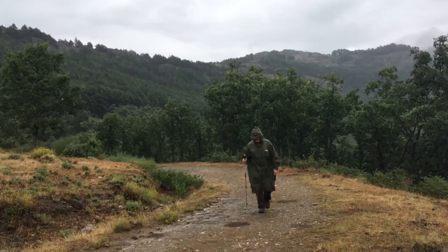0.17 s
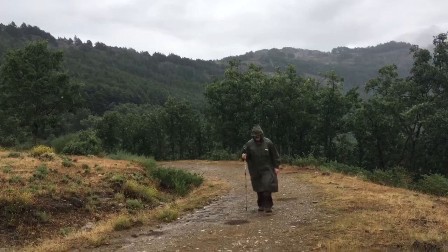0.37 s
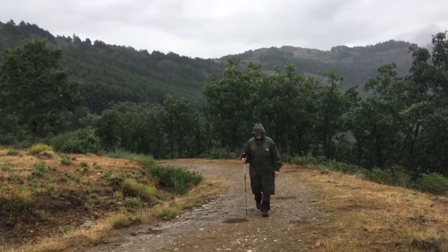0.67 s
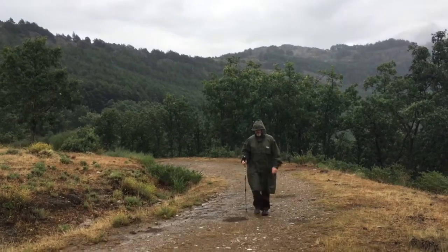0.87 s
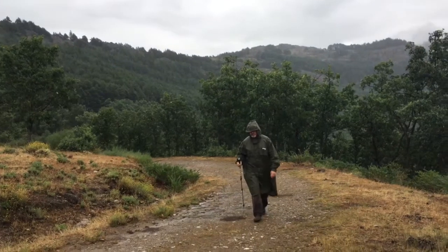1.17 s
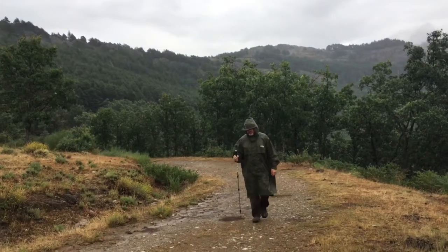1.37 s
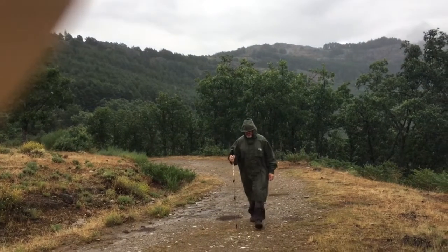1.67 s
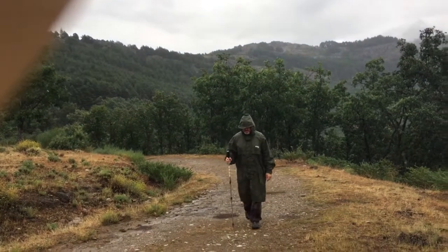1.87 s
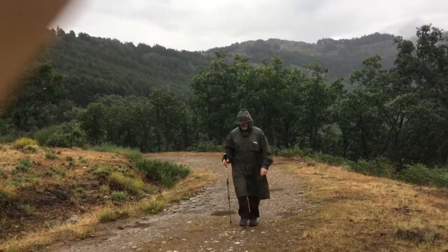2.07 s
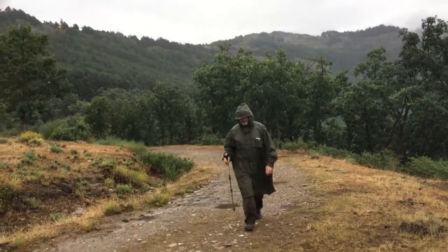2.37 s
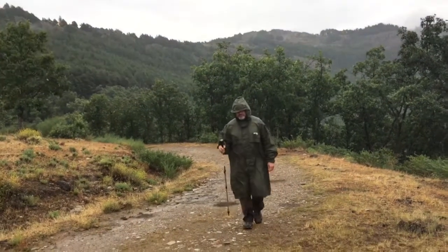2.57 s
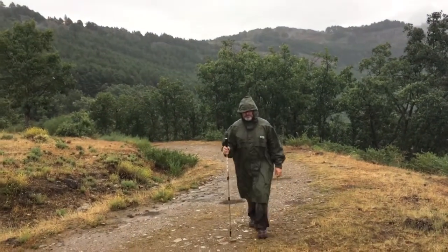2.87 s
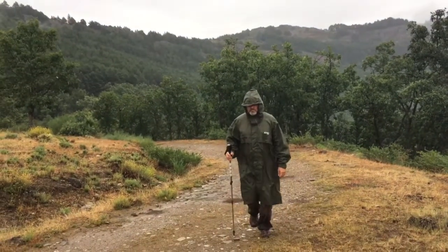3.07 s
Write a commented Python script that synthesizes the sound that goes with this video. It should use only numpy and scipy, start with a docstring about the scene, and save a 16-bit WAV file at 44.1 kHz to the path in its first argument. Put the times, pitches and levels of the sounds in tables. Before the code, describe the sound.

Raindrops tapping sharply and irregularly on taut umbrella cloth, over a soft, steady rain hiss outdoors

```python
"""Steady rain on a gravel track in wooded hills, heard from under an umbrella.
Far rain is filtered noise; small drops are pitched grains; big drops ring the taut cloth with noise bursts.
Wind is low, lumpy noise whose gusts reach higher on the microphone.
A walker's boots crunch wet gravel as dense clicks and squeeze out water as chirps;
a metal pole tip rings on the stones as damped modes."""
import sys
import numpy as np
from scipy import signal
from scipy.fft import rfft, irfft
from scipy.io import wavfile
from scipy.ndimage import uniform_filter1d

SR = 44100
rng = np.random.default_rng(int(sys.argv[2]) if len(sys.argv) > 2 else 0)


def materialize(psi):
    """Save the field psi as 16-bit PCM at rate SR to the path in sys.argv[1].

    A 1-D psi becomes a single channel; in a 2-D psi each row is a channel.
    """
    bounded = np.clip(np.atleast_2d(psi).T, -1, 1)
    quanta = np.round(bounded * 32767).astype(np.int16)
    wavfile.write(sys.argv[1], SR, quanta)


N = 142443
GRAIN_SAMPLES = 4096  # buffer of one ring or burst
DROP_LAG_S, PANEL_RISE_S = .0009, .0007


def gain_of(db):
    """Decibels to amplitude."""
    return 10 ** (np.asarray(db) / 20)


def evened(x):
    """Scales to unit RMS."""
    return x / np.sqrt(np.mean(x ** 2) + 1e-20)


def read(points, hz):
    """Interpolates a spectrum table over log frequency."""
    f, value = np.transpose(points)
    return np.interp(np.log(hz + 1), np.log(f + 1), value)


def over_time(points):
    """Interpolates a level table at every sample."""
    s, value = np.transpose(points)
    return np.interp(np.arange(N) / SR, s, value)


def add(mix, s, sound):
    """Adds a sound at its start time, cut at the end of the mix."""
    part = mix[round(s * SR):][:len(sound)]
    part += sound[:len(part)]


def coloured(x, spectrum, tilt_db_per_octave=0):
    """Filters by a dB spectrum, tilted around about 3 kHz."""
    hz = np.fft.rfftfreq(len(x), 1 / SR)
    gain_db = read(spectrum, hz) + tilt_db_per_octave * np.log2((hz + 300) / 3000)
    return irfft(rfft(x) * gain_of(gain_db), len(x))


def dying(t60_s, rise_s=0.00013):
    """Quick rise, then an exponential fall."""
    t = np.arange(GRAIN_SAMPLES) / SR
    return (1 - np.exp(-t / rise_s)) * gain_of(-60 * t / t60_s)


def ring(hz, t60_s, rise_s=0.00034):
    """One damped mode."""
    t = np.arange(GRAIN_SAMPLES) / SR
    return dying(t60_s, rise_s) * np.sin(2 * np.pi * hz * t)


def burst(lo_hz, hi_hz, t60_s):
    """A click and a dying puff of noise in one band."""
    band = signal.butter(2, [lo_hz, hi_hz], "band", fs=SR, output="sos")
    noise = rng.standard_normal(GRAIN_SAMPLES)
    # 2.2: height of the click over the noise; narrower bands get a taller click
    click = 2.2 * np.sqrt(SR / (hi_hz - lo_hz)) * (np.arange(GRAIN_SAMPLES) == 8)
    return dying(t60_s) * evened(signal.sosfilt(band, noise + click))


# Rain spectrum: (frequency [Hz], relative density [dB per Hz])
RAIN_SPECTRUM = [(88, -41), (150, -6), (179, -20.5), (235, 0.5), (454, -6.5), (969, -1.5), (1150, -2.5),
                 (1350, -0.5), (2190, 0.5), (4240, -4), (4860, -7.5), (6020, -4), (7750, -10.5),
                 (8880, -6.5), (10400, -10), (13400, -6.5), (15600, -9.5)]
# Far rain: (time [s], level [dB])
WASH_LEVEL_DB = [(0.3, -56), (2.33, -54), (2.52, -54.5), (3.23, -53.5)]


def wash():
    """Far rain: noise with patches drifting over time and pitch, and a faint shared flicker."""
    frames = N // 128 + 5
    real, imag, patches = rng.standard_normal((frames, 257, 3)).T
    patches = uniform_filter1d(patches, size=8, axis=0)  # over frequency
    patches = evened(uniform_filter1d(patches, size=16, axis=1))  # over time
    flicker = evened(uniform_filter1d(rng.standard_normal(frames), size=5))
    flicker_db = 1.0 * patches + 1.5 * flicker
    bins = (real + 1j * imag) * gain_of(flicker_db)
    noise = signal.istft(bins, nperseg=512, noverlap=384)[1][:N]
    rain = evened(coloured(noise, [(40, -60), *RAIN_SPECTRUM]))
    return gain_of(over_time(WASH_LEVEL_DB)) * rain


PATTER_DB, PATTER_PER_S, PATTER_SPREAD_DB = -65.5, 1500, 5


def patter():
    """Small drops on cloth, grass and stones: short damped grains at 24 pitches."""
    spread_db = PATTER_SPREAD_DB * np.minimum(rng.exponential(1, N), 3)
    hits = gain_of(spread_db) * (rng.random(N) < PATTER_PER_S / SR)
    kind = rng.integers(0, 24, N)
    out = np.zeros(N)
    for k, hz in enumerate(np.geomspace(600, 14000, num=24)):
        grain = evened(ring(hz, 7 / hz + 0.00036)[:1024])
        grain *= gain_of(read(RAIN_SPECTRUM, hz) + 2.4 * np.log2(hz / 2000))
        out += signal.oaconvolve(hits * (kind == k), grain)[:N]
    return gain_of(PATTER_DB) * evened(out)


# Wind spectrum: (frequency [Hz], relative density [dB per Hz])
WIND_SPECTRUM = [(15, -46), (25, -20), (38, 3), (58, 7), (85, 0.5), (120, -5), (160, -12), (230, -23.5),
                 (400, -48)]
# Upper edge of strong gusts: (frequency [Hz], relative density [dB per Hz])
FLAP_SPECTRUM = [(60, -33), (110, 1), (170, 5.5), (230, -7.5), (300, -13), (500, -52)]
# Wind before flutter: (time [s], level [dB])
GUST_LEVEL_DB = [(0.12, -60), (0.14, -56), (0.21, -64), (0.33, -54), (0.35, -65), (0.4, -64), (0.47, -64),
                 (0.6, -56), (0.64, -63.5), (0.86, -46.5), (0.88, -52), (1.01, -51.5), (1.04, -62.5),
                 (1.14, -51), (1.18, -59), (1.21, -53.5), (1.24, -57.5), (1.35, -49), (1.39, -62.5),
                 (1.5, -51.5), (1.6, -57), (1.63, -58), (1.69, -45.5), (1.72, -64), (1.76, -43.5),
                 (1.83, -56.5), (1.91, -51.5), (1.94, -66.5), (2.14, -60), (2.34, -70.5), (2.46, -50),
                 (2.58, -71), (2.64, -59), (2.67, -86), (2.75, -63), (2.86, -70), (2.96, -47.5), (3.0, -36),
                 (3.14, -66.5), (3.23, -69)]
FLUTTER_DB = 1  # RMS
FLAP_DB, FLAP_AT_GUST_DB, FLAP_DB_PER_GUST_DB = -62.5, -46.5, 2.03


def wind():
    """Lumpy low pressure on the microphone; strong gusts reach higher."""
    rumble = evened(coloured(rng.standard_normal(N), WIND_SPECTRUM))
    rumble /= 0.9 + np.sqrt(uniform_filter1d(rumble ** 2, size=2000))  # tames its own swells
    puffs = uniform_filter1d(rng.standard_normal(N), size=900)
    puffs = evened(uniform_filter1d(puffs, size=900))
    gust_db = over_time(GUST_LEVEL_DB) + FLUTTER_DB * puffs
    flap_db = FLAP_DB + FLAP_DB_PER_GUST_DB * (gust_db - FLAP_AT_GUST_DB)
    flap = evened(coloured(rng.standard_normal(N), FLAP_SPECTRUM)) * gain_of(flap_db)
    return gain_of(gust_db) * evened(rumble) + flap


# Fine drops, treble only: (time [s], level [dB])
FINE_DROPS = [(0.1256, -51), (0.1354, -55), (0.2593, -46), (0.3471, -55), (0.3684, -54), (0.5167, -59),
              (0.6274, -51), (1.6474, -50), (1.732, -46), (1.7489, -55), (1.7908, -44), (2.6314, -49),
              (3.1208, -39)]


def tick(s, db):
    """A fine drop bursting: a dying puff of treble noise."""
    return s + DROP_LAG_S, gain_of(db) * burst(10000, 15800, t60_s=.006)


# Big drops on the cloth: (time [s], level [dB], panel mode [Hz], ring T60 [s],
# thud [dB re level], snap [dB re level], spray [dB re level])
CLOTH_DROPS = [(0.315, -49.5, 2300, 0.0066, -1.5, -15, -21), (0.39, -39.5, 1850, 0.0083, -14.5, -11, -15),
               (0.825, -31, 2110, 0.0075, -13.5, -10, -15), (0.847, -49, 3160, 0.011, -28, -9, -15),
               (0.942, -48, 1220, 0.0065, -5.5, -20, -19), (1.363, -33.5, 1935, 0.015, -7.5, -13.5, -29),
               (1.454, -34, 970, 0.003, -8.5, -7.5, -15), (1.545, -29, 1270, 0.0051, -18.5, -13.5, -12),
               (1.556, -32.5, 1900, 0.008, -12.5, -10, -18), (1.587, -31.5, 1830, 0.01, -13, -6, -15),
               (1.638, -22, 1910, 0.003, -19.5, -23.5, -19), (1.665, -17, 1750, 0.0041, -8, -6, -17),
               (1.784, -64.5, 2600, 0.0076, 8, -9, -17), (1.825, -43, 2050, 0.009, -30, -0.5, -12),
               (1.835, -39.5, 2150, 0.0072, -20, -6, -9), (1.848, -47, 2120, 0.0075, -27, -9, -15),
               (1.863, -29, 1830, 0.0035, -49, -11, -11), (2.031, -46, 3670, 0.007, -17, -5, -3),
               (2.092, -26, 2240, 0.007, -14.5, -7.5, -20), (2.133, -48, 2150, 0.011, -10, 0, -7),
               (2.143, -28, 2100, 0.0064, -20.5, -13, -16), (2.168, -38.5, 2310, 0.016, -11.5, -10, -13),
               (2.198, -45.5, 3600, 0.009, -16, -13, -20), (2.311, -36, 2000, 0.0045, -15, -14, -14),
               (2.324, -37.5, 2010, 0.0076, -16, -19, -15), (2.375, -29, 2900, 0.0066, -20, -26, -12),
               (2.384, -35, 3570, 0.0095, -16.5, -0.5, -13), (2.611, -42.5, 2150, 0.015, -12, -9, -13),
               (2.616, -34.5, 2350, 0.012, -12, -13, -4), (2.624, -32.5, 1630, 0.0095, -8.5, -8.5, -19),
               (2.709, -21.5, 1610, 0.003, -17.5, -10, -16.5), (2.727, -45, 1830, 0.0045, -20, -11, -3),
               (2.74, -36.5, 1720, 0.006, -12.5, -15, -17), (2.782, -28.5, 1730, 0.0058, -18.5, -8, -12),
               (2.83, -34.5, 945, 0.003, -8.5, -16, -16), (2.896, -44, 1830, 0.009, -9, -12, -15),
               (3.019, -44.5, 1090, 0.011, -12, -20, -22), (3.142, -28.5, 2120, 0.0083, -20, -15.5, -22),
               (3.188, -33.5, 2160, 0.003, -17.5, -16, -19.5)]
MODE_RATIO, RATTLE_DB = 1.35, -13


def tap(s, db, hz, t60_s, thud_db, snap_db, spray_db):
    """A big drop: the cloth panel rings in three modes, with a thud, a rattle, a snap and spray."""
    panel = 2.14 * ring(hz, t60_s, PANEL_RISE_S)
    panel -= 0.42 * ring(hz * MODE_RATIO, 0.69 * t60_s)
    panel += 0.13 * ring(hz / MODE_RATIO, 0.5 * t60_s)
    noise = gain_of(thud_db) * burst(280, 1400, t60_s=.018)
    noise += gain_of(snap_db) * burst(3000, 7500, t60_s=.011)
    noise += gain_of(spray_db) * burst(7500, 15500, t60_s=.011)
    noise += gain_of(RATTLE_DB) * burst(900, 3000, t60_s=.02)
    return s + DROP_LAG_S, gain_of(db) * (panel + noise)


# Pole tip on stone: (time [s], knock [Hz], knock level [dB], clack level [dB], ping level [dB])
POLE_STRIKES = [(.6143, 2070, -26, -32, -42), (2.9738, 2120, -29, -34, -50)]
KNOCK_T60_S, PING_T60_S, PING_LAG_S = .018, .095, .002
PING_HZ, PING_BEAT_HZ = 9830, 47


def pole(s, hz, knock_db, clack_db, ping_db):
    """The tip knocks and clacks; then the tube pings with a beating pair of modes."""
    ping = ring(PING_HZ, PING_T60_S) + 0.7 * ring(PING_HZ + PING_BEAT_HZ, PING_T60_S)
    ping = np.roll(ping, round(PING_LAG_S * SR))
    knock = gain_of(knock_db) * ring(hz, KNOCK_T60_S, PANEL_RISE_S)
    clack = gain_of(clack_db) * burst(700, 15000, t60_s=.018)
    return s, knock + clack + gain_of(ping_db) * ping


# Boots on wet gravel: (time [s], length [s], level [dB], brightness [dB per octave])
BOOT_STEPS = [(.625, 0.072, -51.5, 3), (1.2, 0.12, -56.5, 1.5), (1.3, 0.096, -57.5, 8.5),
              (1.53, 0.1, -53.5, 0.5), (1.78, 0.095, -51.5, 4), (2.18, 0.026, -55, 3.5),
              (2.368, 0.044, -45, 2.5), (2.39, 0.12, -53.5, 1), (2.6, 0.045, -67, 13),
              (2.655, 0.022, -53, 0), (2.72, 0.086, -53, 0), (2.928, 0.063, -54, 3.5),
              (2.947, 0.028, -43, 4.5), (2.975, 0.013, -42.5, 0), (3.12, .08, -79, 0)]
# Gravel spectrum: (frequency [Hz], relative density [dB per Hz])
GRIT_SPECTRUM = [(150, 23), (500, -24.5), (1200, 0), (2300, 3), (4500, -4), (8000, -10.5), (11000, -11.5),
                 (16000, -22.5)]
GRIT_PER_S, GRIT_SPREAD_DB = 7000, 3.0


def step(s, length_s, db, tilt_db_per_octave):
    """Gravel grinds: dense uneven clicks, each a short crumble, under a quick load and slow release."""
    n = 6000
    t = np.arange(n) / SR
    spread_db = GRIT_SPREAD_DB * np.minimum(rng.exponential(1, n), 3)
    clicks = rng.standard_normal(n) * gain_of(spread_db) * (rng.random(n) < GRIT_PER_S / SR)
    crumble = burst(200, 18000, t60_s=.004)[:400]
    spectrum = rfft(signal.oaconvolve(clicks, crumble)[:n])
    flat = irfft(spectrum / uniform_filter1d(abs(spectrum), size=120), n)
    grit = evened(coloured(flat, GRIT_SPECTRUM, tilt_db_per_octave))
    load = np.sin(np.pi * np.clip(t / length_s, 0, 1) ** 0.45)
    return s, gain_of(db) * grit * load


# Water squeezed from under a boot: (time [s], start [Hz], end [Hz], length [s], level [dB])
SQUEEZED_WATER = [(2.9435, 7000, 5750, .0065, -35), (2.9475, 9200, 8300, .004, -36),
                  (2.950, 8200, 7000, .004, -36), (2.9525, 6500, 5600, .003, -37),
                  (2.953, 4600, 3900, .0035, -34), (2.957, 3600, 1800, .009, -40)]


def squelch(s, from_hz, to_hz, length_s, db):
    """A short falling chirp with a ragged envelope."""
    u = np.arange(0, 1, 1 / (length_s * SR))
    hz = to_hz + (from_hz - to_hz) * (1 - u) ** 2
    ragged = 1 + 0.3 * evened(uniform_filter1d(rng.standard_normal(2000), size=12))[:len(u)]
    envelope = ragged * np.sin(np.pi * u ** 0.66)
    return s, gain_of(db) * envelope * np.sin(2 * np.pi * np.cumsum(hz) / SR)


def scene():
    """Rain, wind, drops and walker in one channel."""
    mix = wash() + patter() + wind()
    for rows, source in ((FINE_DROPS, tick), (CLOTH_DROPS, tap), (POLE_STRIKES, pole),
                         (BOOT_STEPS, step), (SQUEEZED_WATER, squelch)):
        for row in rows:
            add(mix, *source(*row))
    return mix[None]


START_S, FADE_IN_S = .1198, .001
MIC_LOW_HZ, EDGE_HZ = 36, 15800


def record(dry):
    """The sound switches on; the microphone loses the lowest bass; then the band limit."""
    on = np.clip((np.arange(N) / SR - START_S) / FADE_IN_S, 0, 1)
    high_pass = signal.butter(3, MIC_LOW_HZ, "high", fs=SR, output="sos")
    heard = on * signal.sosfilt(high_pass, dry)
    low_pass = signal.firwin(511, EDGE_HZ, window=("kaiser", 9), fs=SR)
    return signal.oaconvolve(heard, low_pass[None], "same")


dry = scene()
out = record(dry)
materialize(out)
```